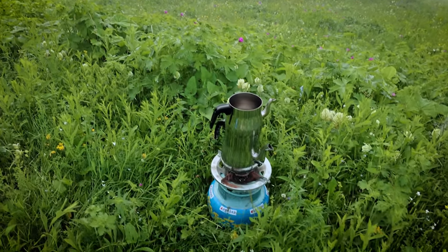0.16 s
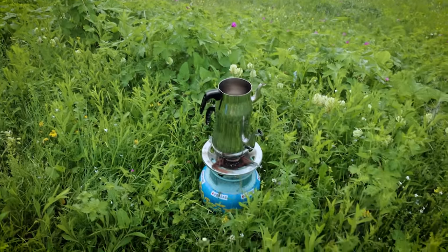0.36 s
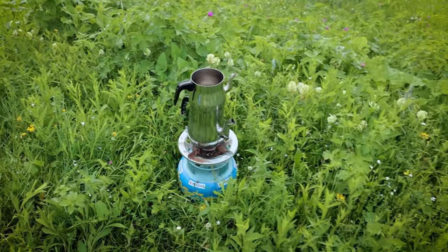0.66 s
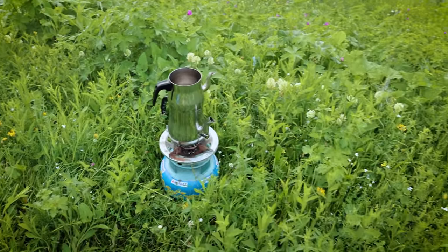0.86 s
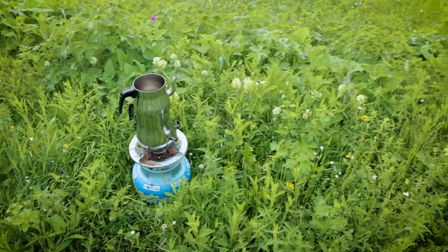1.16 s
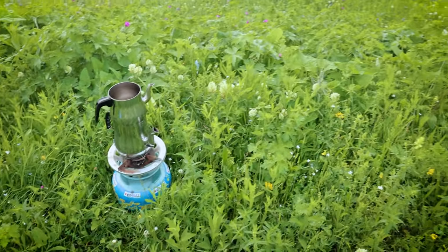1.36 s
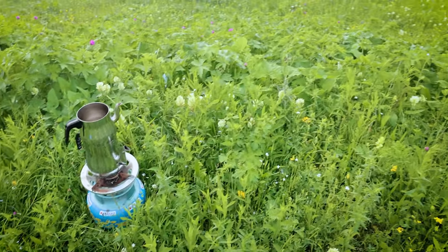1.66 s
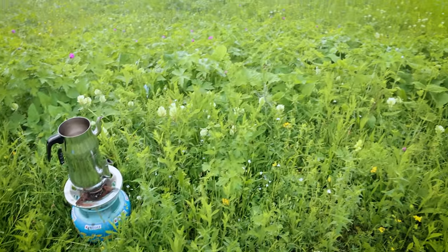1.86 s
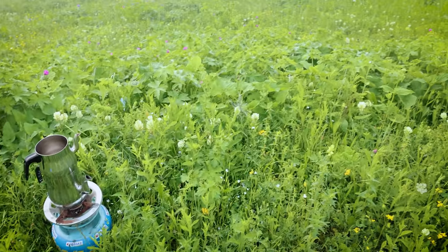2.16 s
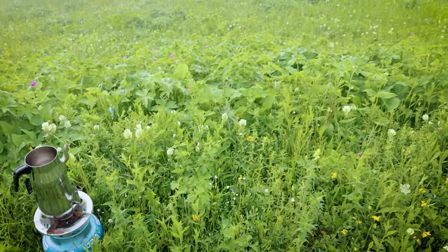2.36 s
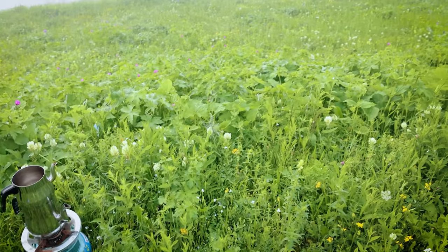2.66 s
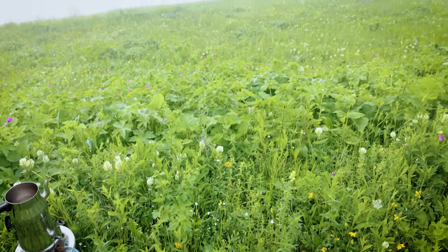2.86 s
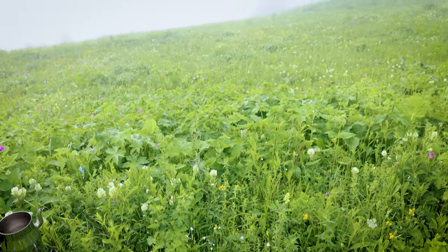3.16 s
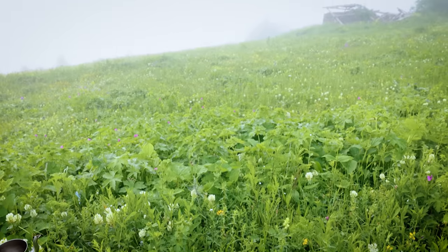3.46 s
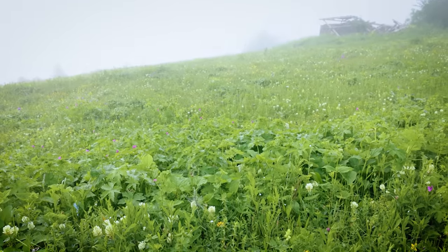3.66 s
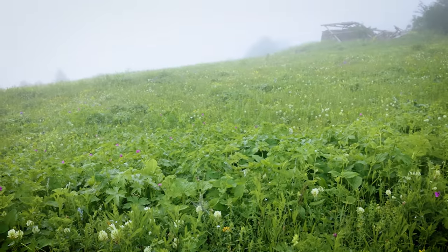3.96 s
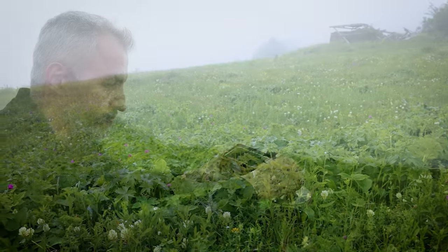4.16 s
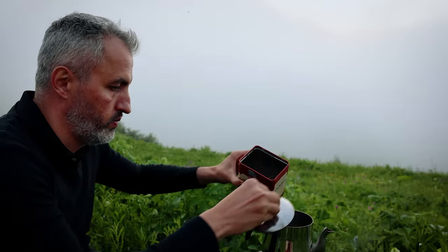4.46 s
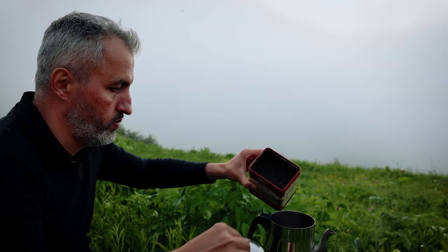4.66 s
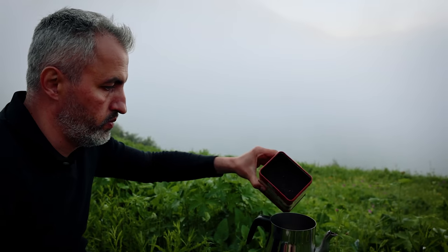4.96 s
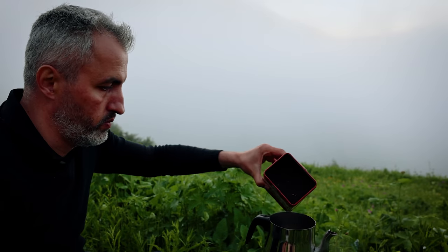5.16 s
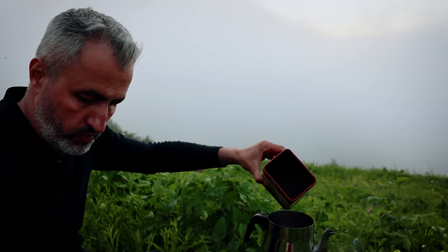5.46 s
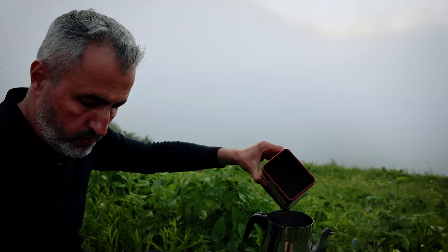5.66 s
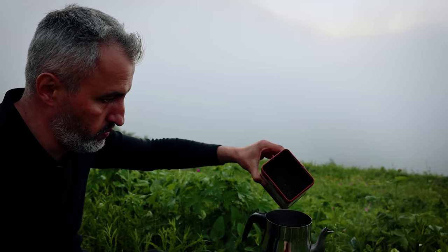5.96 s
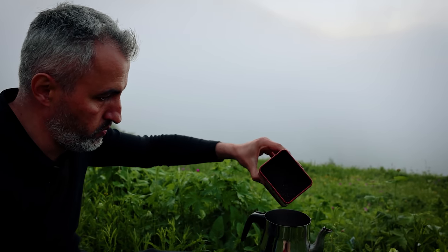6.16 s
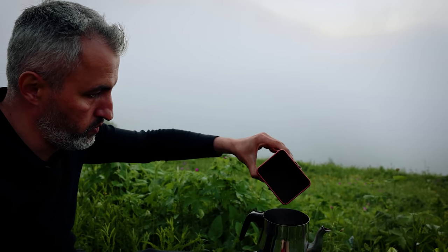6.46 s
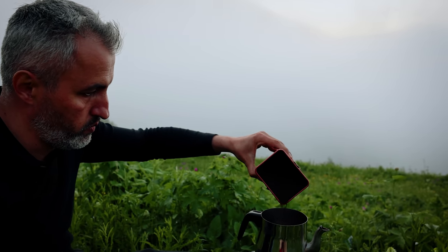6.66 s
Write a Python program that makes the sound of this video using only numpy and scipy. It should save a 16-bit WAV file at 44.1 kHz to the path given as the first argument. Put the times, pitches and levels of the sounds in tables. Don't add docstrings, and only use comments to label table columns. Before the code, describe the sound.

From 0 to 4.3 seconds, a quiet open meadow: far soft wind and many small birds. A nearer bird gives clear sliding whistles and quick chirps from about 0.6 to 1.6 s, with another short drop at 2.25 s; a lower hoarse bird calls around 0.1 to 0.55 s. Fainter whistles overlap throughout, with a slight slope echo. Grass swishes at the start and around 1.2 s; stalks tick near 3.8 s. At 4.3 s it cuts instantly to a close, much louder gas stove: bright steady hiss, high whistling jet, fine fizz and low flame roar, with a few last chirps until 4.6 s. Dull thumps and sputters come at 4.6-5.5 s and 6.1-6.5 s, with low wind puffs. At 5.98 s a tin strikes the steel pot, a sharp, quickly damped clank. Around 6.55 s dry tea rustles in; hiss and roar swell at the end.

```python
import sys
import numpy as np
from scipy import signal
from scipy.fft import rfft, irfft, next_fast_len
from scipy.io import wavfile
from scipy.ndimage import uniform_filter1d, map_coordinates

SR = 44100
rng = np.random.default_rng(int(sys.argv[2]) if len(sys.argv) > 2 else 0)


def transcribe(u):
    v = np.clip(np.atleast_2d(u).T, -1, 1)
    q = np.round(v * 32767).astype(np.int16)
    wavfile.write(sys.argv[1], SR, q)


def voltage_ratio(decibels):
    exponent = np.asarray(decibels, float) / 20
    return 10 ** exponent


N = 300321
CUT_S = 4.280


def unit(x):
    return x / np.sqrt(np.mean(x ** 2) + 1e-20)


def along(points, hz):
    f, value = np.transpose(points)
    return np.interp(np.log(hz + 1), np.log(f + 1), value)


def curves(rows):
    s, *columns = np.transpose(rows)
    return [np.interp(np.arange(N) / SR, s, column) for column in columns]


def wobble(rate):
    knots = rng.standard_normal(int(N * rate / SR) + 4)
    return map_coordinates(knots, [np.arange(N) * rate / SR])


def filtered(x, response):
    m = next_fast_len(N + SR // 2)
    return irfft(rfft(x, m) * response(np.fft.rfftfreq(m, 1 / SR)), m)[..., :N]


def resonance(f, hz, width):
    return 1j * f * width / (hz * hz - f * f + 1j * f * width)


def band(hz, width):
    return lambda f: 1 / (1 + (2 * (f - hz) / width) ** 4)


def shaped(spectrum):
    return lambda hz: voltage_ratio(along(spectrum, hz))


def rush(response, patchy_db, tall=6, long=10):
    z = signal.stft(rng.standard_normal(N), nperseg=512)[2]
    field = uniform_filter1d(rng.standard_normal(z.shape), size=tall, axis=0)
    field = uniform_filter1d(field, size=long, axis=1)
    x = signal.istft(z * voltage_ratio(patchy_db * unit(field)), nperseg=512)[1][:N]
    return unit(filtered(x, response))


ARCH_DB = 9.5


def glide(s, length, from_hz, to_hz, db, bend):
    u = np.linspace(0, 1, num=9)
    hz = to_hz + (from_hz - to_hz) * (1 - u) ** bend
    return np.transpose([s + length * u, hz, db - ARCH_DB * (2 * u - 1) ** 2])


def arch(s, length, foot_hz, top_hz, db):
    rows = glide(s, length, foot_hz, foot_hz, db, 1)
    bow = np.sin(np.linspace(0, np.pi, num=len(rows)))
    return rows + np.outer(bow, [0, top_hz - foot_hz, 0])


# start in seconds, length in seconds, first pitch in Hz,
# last pitch in Hz, peak in dB.
FALLING = [(0, .05, 3760, 2750, -65), (2.33, .09, 2350, 2070, -61), (.2, .07, 3500, 2900, -67),
           (.265, .06, 3550, 2900, -67), (.52, .06, 3850, 3050, -70), (.79, .04, 5800, 4680, -73),
           (.935, .095, 4400, 2650, -61), (1.1, .03, 4100, 3350, -63), (1.69, .02, 4650, 3490, -69),
           (1.83, .12, 4390, 2890, -66), (1.97, .1, 3110, 2150, -70), (2.35, .05, 4250, 3780, -67),
           (2.43, .06, 4000, 3500, -71), (2.57, .06, 4950, 4050, -73), (3.1, .07, 3300, 2550, -69),
           (3.685, .07, 4300, 2850, -67), (1.7, .13, 2300, 1750, -71), (2.11, .06, 4800, 3850, -67),
           (2.12, .05, 5150, 4200, -68), (2.135, .04, 4950, 4300, -70), (2.05, .09, 2200, 1850, -66),
           (1.135, .02, 5300, 4600, -68), (2.29, .07, 3500, 3000, -68),
           (2.65, .07, 3700, 2950, -67), (2.75, .04, 2750, 2200, -68), (2.8, .06, 3780, 3100, -68),
                 (2.95, .09, 3410, 2260, -70), (3.0, .08, 3990, 2550, -65), (3.11, .09, 4650, 2650, -68),
                 (3.125, .12, 5300, 3250, -67), (3.31, .05, 3400, 2500, -70),
                 (3.547, .085, 5650, 3200, -64), (3.6, .09, 4580, 2700, -68), (3.19, .1, 3700, 2750, -67),
                 (1.425, .015, 5600, 5000, -66), (3.81, .05, 4000, 3000, -68), (3.83, .04, 2200, 1850, -72),
                 (1.1, .05, 4500, 3100, -66), (1.385, .02, 3400, 3050, -64), (3.27, .1, 3900, 2500, -69),
                 (4.08, .08, 5000, 3700, -76), (3.91, .14, 4250, 2100, -70), (2.69, .1, 3150, 2250, -70),
                 (4.615, .03, 5200, 4000, -59), (4.58, .03, 4500, 4700, -62)]
# as above, in seconds, seconds, Hz, Hz, dB.
RISING = [(.09, .065, 3160, 3520, -62), (2.86, .08, 3800, 4150, -69), (.805, .04, 3250, 3560, -67),
          (1.45, .18, 2990, 3950, -65), (1.84, .21, 3120, 4010, -69), (2.53, .11, 3150, 3710, -68),
          (2.55, .04, 3300, 4100, -72), (2.77, .06, 3300, 4700, -72), (2.87, .07, 2850, 3300, -69),
          (3.02, .06, 4050, 4550, -72), (3.36, .06, 3050, 3500, -69), (.15, .05, 2600, 3450, -69),
          (.72, .04, 3100, 3450, -68), (2.67, .05, 4180, 5000, -73), (2.83, .07, 4330, 4850, -72),
          (3.455, .09, 2700, 3760, -64), (3.66, .15, 3250, 4450, -70), (3.79, .11, 4350, 5000, -63),
          (3.96, .09, 2820, 3560, -70), (4.16, .05, 3600, 3900, -66), (4.11, .05, 4080, 3690, -65),
          (4.205, .05, 3900, 3210, -61), (4.13, .16, 2840, 3750, -65), (3.68, .15, 1980, 2270, -66),
          (1.49, .16, 2000, 2170, -69)]
# start in seconds, length in seconds, pitch in Hz, peak in dB.
HELD_NOTES = [(.18, .12, 2810, -60), (2.73, .06, 2230, -68), (3.55, .08, 3500, -68), (2.96, .06, 4080, -71),
              (.585, .03, 3500, -66), (.865, .04, 4550, -65), (1.3, .03, 3100, -66),
              (2.215, .05, 2140, -68), (2.43, .11, 2700, -67), (1.19, .015, 3480, -60),
              (1.11, .015, 3050, -62), (1.16, .05, 3800, -69), (.33, .07, 3450, -68),
              (3.07, .22, 2080, -68), (3.29, .11, 2340, -64), (3.49, .12, 2400, -69), (3.7, .05, 3300, -63),
              (3.91, .045, 3260, -64), (4.0, .045, 3640, -64), (4.37, .1, 2700, -57),
              (4.42, .04, 4420, -61)]
# start in seconds, length in seconds, foot in Hz, top in Hz, peak in dB.
ARCHED = [
    (0.322, 0.15, 3150, 3870, -60.5),
    (.46, 0.1, 3300, 3950, -75),
    (.77, .04, 5500, 5950, -75),
    (3.207, 0.038, 5600, 6100, -72),
]
FALL_BEND, RISE_BEND = 1.5, 1.3
SAG_HZ_PER_S = 490


def whistles():
    held = [glide(s, length, hz, hz - SAG_HZ_PER_S * length, db, 0.92) for s, length, hz, db in HELD_NOTES]
    falls = [glide(*row, FALL_BEND) for row in FALLING]
    rises = [glide(*row, RISE_BEND) for row in RISING]
    return falls + rises + held + [arch(*row) for row in ARCHED]


def chorus(count):
    notes = []
    for when, pitch, slide, length, size in rng.random((count, 5)):
        s = 4.3 * when + np.array([0, .5, 1]) * (.08 + .14 * length)
        bend_hz = np.array([1, .4, 0]) * (2100 * slide - 800)
        level_db = -78.5 + 6 * size + np.array([-3, 0, -3])
        notes.append(np.transpose([s, 2450 + 1100 * pitch + bend_hz, level_db]))
    return notes


# frequency in Hz, t60 in seconds.
SLOPE_T60 = [(1500, .5), (4000, .3), (8000, .2)]


def slope_echo(x):
    hz, t, z = signal.stft(rng.standard_normal(SR // 2), SR, nperseg=256)
    decay = voltage_ratio(-60 * t / along(SLOPE_T60, hz)[:, None])
    tail = signal.istft(z * decay, SR, nperseg=256)[1]
    return signal.fftconvolve(np.pad(x, (600, 0)), tail / np.linalg.norm(tail))[:N]


# time in seconds, pitch in Hz, effort in dB.
NEAR_CALLS = [
    [(0.625, 4370, -66), (0.635, 4300, -64), (0.648, 3680, -60), (0.658, 2700, -73), (0.67, 2400, -68),
     (0.68, 2500, -66.5)],
    [(0.69, 2970, -71), (0.72, 3450, -66), (0.75, 3590, -67), (0.77, 3680, -50), (0.81, 4150, -51.5),
     (0.835, 4120, -64)],
    [(0.9, 6040, -70), (0.935, 5100, -68), (0.965, 4420, -49.5), (0.99, 4100, -53), (1.005, 3870, -45.5),
     (1.033, 3430, -46.5), (1.057, 3080, -61), (1.077, 3040, -50.5), (1.1, 3240, -69)],
    [(1.158, 2835, -49.5), (1.18, 2290, -63), (1.19, 2314, -62), (1.207, 2790, -54), (1.225, 3160, -60),
     (1.265, 3500, -46), (1.28, 3620, -50), (1.294, 3710, -40.5), (1.317, 3880, -48.5)],
    [(1.375, 4840, -59), (1.383, 3540, -59), (1.39, 4330, -52), (1.398, 4700, -51), (1.405, 4870, -58)],
    [(1.436, 4950, -64), (1.444, 4570, -50), (1.456, 4120, -53), (1.465, 3830, -44.5), (1.476, 3480, -55),
     (1.497, 3050, -60), (1.53, 2760, -54), (1.574, 2410, -64), (1.59, 2340, -70)],
    [(2.245, 4400, -60), (2.262, 3710, -53), (2.272, 3000, -60), (2.28, 2300, -60)],
]
# time in seconds, pitch in Hz, effort in dB.
HOARSE_CALLS = [
    [(0.085, 2420, -71), (0.12, 2290, -66), (0.155, 2250, -57), (0.19, 2190, -63), (0.23, 2230, -72)],
    [(0.28, 2233, -70), (0.33, 2210, -70), (0.37, 2240, -62), (0.41, 2330, -62.5), (0.45, 2200, -61),
     (0.49, 2080, -68), (0.5, 2250, -66), (0.55, 2220, -73)],
]
# time in seconds, pitch in Hz, effort in dB.
LONG_SLIDES = [
    [(1.79, 4160, -64), (1.8, 2985, -59), (1.815, 2940, -68), (1.84, 3560, -63), (1.98, 4220, -60),
     (2.03, 4540, -59), (2.048, 5120, -64)],
    [(3.228, 6230, -68), (3.25, 5080, -63), (3.27, 4440, -61), (3.32, 4000, -73), (3.4, 3680, -63.5),
     (3.455, 3700, -64)],
]
HOARSE_DB, HOARSE_UNDER_HZ = 3.6, 2550


def birds():
    out = np.zeros(N)
    shimmer, waver = voltage_ratio(1.2 * wobble(70)), 1 + .003 * wobble(90)
    hoarse_db = HOARSE_DB * wobble(170) - .6
    for rows in [*NEAR_CALLS, *HOARSE_CALLS, *LONG_SLIDES, *whistles(), *chorus(count=240)]:
        s, hz, db = np.transpose(rows)
        i = np.arange(round(s[0] * SR), round(s[-1] * SR))
        smooth = lambda v: uniform_filter1d(np.interp(i / SR, s, v), size=220)
        pitch = smooth(hz)
        ends = np.clip(np.minimum(i - i[0], i[-1] - i) / (0.0019 * SR), 0, 1)
        rasp_db = hoarse_db[i] * np.clip((HOARSE_UNDER_HZ - pitch) / 250, 0, 1)
        tone = np.sin(2 * np.pi * np.cumsum(pitch * waver[i]) / SR)
        out[i] += np.sqrt(2) * ends * voltage_ratio(smooth(db) + 1.5 + rasp_db) * tone
    out = out * shimmer
    return out + voltage_ratio(-17.5) * slope_echo(out)


# time in seconds, brightening in dB.
JET_FLARES = [
    (4.29, 2),
    (4.59, 5),
    (4.87, 6.5),
    (5.18, 1),
    (5.32, -5),
    (5.6, 5),
    (5.75, 8),
    (5.95, 3),
    (6.2, 1),
    (6.72, 7),
]
# time in seconds, jump in dB.
JET_SPURTS = [
    (4.865, 4),
    (5.305, 10),
    (6.05, 12),
    (6.7, 2),
]
FLARE_S, SPURT_S = 0.071, 0.018


def flares():
    t = np.arange(N) / SR
    swell_db = sum(db * np.exp(-((t - s) / FLARE_S) ** 2) for s, db in JET_FLARES)
    spit_db = sum(db * (t > s) * np.exp(-np.abs(t - s) / SPURT_S) for s, db in JET_SPURTS)
    return swell_db + spit_db


# time in seconds, centre of the whistle in Hz.
JET_CENTRE = [(4.29, 7170), (4.4, 6900), (4.93, 7220), (5.44, 7030), (5.81, 7360), (6.46, 6700),
              (6.55, 7500), (6.74, 7400), (6.8, 6960)]


def throat():
    return np.clip((curves(JET_CENTRE)[0] - 6750) / 700, 0, 1)


RIDGES = dict(tall=3, long=22)
# time in seconds, whistle band in dB.
JET_LEVEL = [(4.29, -52), (4.59, -53), (4.76, -51), (4.81, -61), (4.87, -50.5), (5.0, -52.5), (5.18, -49.5),
             (5.25, -52), (5.32, -48), (5.39, -49.5), (5.57, -52), (5.71, -52.5), (5.79, -54), (6.21, -53),
             (6.4, -55.5), (6.46, -59.5), (6.62, -54.5), (6.77, -47.5)]


def jet():
    up = throat()
    low_core = np.sqrt(1 - up) * rush(band(6800, width=550), patchy_db=3.0, **RIDGES)
    high_core = np.sqrt(up) * rush(band(7350, width=550), patchy_db=3.0, **RIDGES)
    whistle = voltage_ratio(-3.5) * rush(band(hz=6970, width=1460), patchy_db=2.0, **RIDGES)
    whistle = whistle + voltage_ratio(-3) * (low_core + high_core)
    edge_db = -10 + flares() - 1.2
    edge = voltage_ratio(edge_db) * rush(band(hz=8050, width=800), patchy_db=3, **RIDGES)
    return voltage_ratio(curves(JET_LEVEL)[0]) * (whistle + edge)


# time in seconds, width in seconds, change in dB.
FIZZ_SWELLS = [
    (4.35, .08, 4),
    (4.8, 0.026, 0.5),
    (5.08, .05, 2.5),
    (5.32, 0.042, 0.5),
    (5.72, 0.085, 2),
    (6.05, 0.039, 2),
    (6.4, .08, -4),
    (6.55, 0.026, 9),
]
FIZZ_DB, FIZZ_SHARE, FIZZ_FLARES = -58.5, 0.31, 0.35


def fizz():
    t = np.arange(N) / SR
    jet_db, flare_db = curves(JET_LEVEL)[0], flares()
    level_db = FIZZ_DB + FIZZ_SHARE * (jet_db - jet_db[t > CUT_S].mean()) + FIZZ_FLARES * flare_db - 1.4
    level_db = level_db + sum(db * np.exp(-((t - s) / width) ** 2) for s, width, db in FIZZ_SWELLS)
    sway_db = 0.3 * wobble(4.4) + 0.22 * (flare_db - 6.0) + 1.2 * (throat() - .45)
    low = rush(band(10950, width=2000), patchy_db=1.7, **RIDGES)
    high = rush(band(11850, width=2000), patchy_db=1.7, **RIDGES)
    return voltage_ratio(level_db - 3.0) * (voltage_ratio(-sway_db) * low + voltage_ratio(sway_db) * high)


# frequency in Hz, width in Hz, level in dB.
BURNER_MODES = [(1230, 170, -4.5), (1428, 277, -2), (2197, 390, -7.5), (3100, 400, -5.5), (3706, 234, 0),
                (4044, 345, -4.5)]
# frequency in Hz, level in dB per Hz.
VEIL_SPECTRUM = [(600, -22), (1000, -2.5), (4500, -3), (6000, -8), (9500, -2.5), (12800, -17),
                 (14500, -3.5), (15700, -11)]
HISS_DB, HISS_GROWS_DB_PER_S = -49, 0.38


def hiss():
    level_db = HISS_DB + HISS_GROWS_DB_PER_S * (np.arange(N) / SR - CUT_S)

    def coloured(f):
        modes = sum((-1) ** k * voltage_ratio(db) * resonance(f, hz, w) for k, (hz, w, db) in enumerate(BURNER_MODES))
        return modes * resonance(f, hz=2400, width=5900) ** 2

    burner = voltage_ratio(level_db + .4) * rush(coloured, patchy_db=1.3, **RIDGES)
    return burner + voltage_ratio(level_db - 9) * rush(shaped(VEIL_SPECTRUM), patchy_db=.4)


# time in seconds, roar in dB.
FLAME_LEVEL = [(4.29, -55.5), (4.6, -52.5), (5.1, -52.5), (5.4, -52), (5.95, -52), (6.15, -50),
               (6.4, -47.5), (6.58, -48.5), (6.7, -52), (6.81, -46)]
# frequency in Hz, level in dB per Hz.
ROAR_SPECTRUM = [(13, -30), (22, -2), (48, -3), (207, 0.5), (392, -5.5), (440, -3), (581, -8),
                 (1100, -11.5), (1430, -30), (2420, -120)]


def stove():
    roar_db = curves(FLAME_LEVEL)[0] + 0.1 + 0.37 * wobble(30)
    roar = voltage_ratio(roar_db) * rush(shaped(ROAR_SPECTRUM), patchy_db=1.96)
    flutter = voltage_ratio(.5 * wobble(25) + .7 * wobble(200))
    return roar + flutter * (hiss() + fizz() + jet())


# start in seconds, peak in dB.
FLAME_THUMPS = [(4.631, -35), (4.649, -46), (4.687, -37), (4.737, -34), (4.948, -36), (5.09, -36),
                (5.118, -35), (5.32, -35), (5.544, -55), (6.128, -33), (6.198, -27), (6.253, -31),
                (6.287, -30), (6.44, -38), (6.459, -28.5), (6.637, -49), (6.789, -57)]
# start in seconds, dull peak in dB, bright peak in dB.
FLAME_SPUTTERS = [(4.644, -45, -64), (4.945, -38, -65), (4.99, -40, -57), (5.086, -37, -56),
                  (5.27, -47, -62), (5.526, -35, -63), (5.538, -35.5, -70), (6.119, -42, -60),
                  (6.2, -35, -56), (6.283, -32.5, -62), (6.326, -38, -60), (6.444, -35, -66)]
# start in seconds, peak in dB.
DRY_SPARKS = [
    (6.287, -49),
    (6.331, -52),
    (6.443, -53),
    (6.2, -52),
]
# start in seconds, peak in dB, signed push or pull.
HAND_BUMPS = [
    (4.741, -41, 1),
    (4.948, -41, -1),
    (5.087, -37, -0.86),
    (5.272, -37, -1),
    (5.529, -40, 0.91),
    (5.539, -33, 1),
    (6.202, -33, 1),
    (6.286, -41, -1.1),
    (6.443, -42, -1),
    (6.459, -41, 1),
]
SPARK_S, BUMP_S = 0.0086, 0.00035


def thumps():
    out, t = np.zeros(N + SR), np.arange(1500) / SR

    def place(s, x):
        out[round(s * SR):][:len(t)] += x

    for s, db in FLAME_THUMPS:
        u = t / 0.0013
        place(s, -voltage_ratio(db - 9.5) * np.sin(u) * np.exp(-.12 * (u - 3) ** 2))
    for s, db, bright_db in FLAME_SPUTTERS:
        noise = rng.standard_normal((2, len(t)))
        dull = voltage_ratio(db - 60 * t / 0.065) * signal.lfilter([.15, .15], [1, -.9], noise[0])
        bright = voltage_ratio(bright_db + 3 - 60 * t / .012) * signal.lfilter([.3, .3], [1, -.5], noise[1])
        place(s, voltage_ratio(-3.0) * (dull + bright))
    for s, db in DRY_SPARKS:
        place(s, voltage_ratio(db - 60 * t / SPARK_S) * np.diff(rng.standard_normal(len(t) + 1)))
    for s, db, sign in HAND_BUMPS:
        u = t / BUMP_S
        place(s, sign * voltage_ratio(db + 2) * np.sin(u) * np.exp(-.4 * u))
    return out[:N]


# start in seconds, peak in dB.
RIM_KNOCK = [
    (5.9823, -14),
]
# frequency in Hz, level in dB, t60 in seconds.
POT_MODES = [(517, -6, .2), (765, -5, .1), (797, 0, .13), (1150, -10, .12), (1192, -5, .14),
             (1230, -13, .15), (1345, -11, .2), (1432, -6, .12), (1825, -6, .08), (1935, -4, .1),
             (1968, -3, .12), (2298, -8, .25), (2390, -4, .6), (2435, -1, .2), (2490, 3, .09),
             (2730, -10, .2), (2821, -4, .2), (3342, -4, .17), (3488, -11, .2), (3612, -6, .15),
             (3760, 5, .03), (3950, 9, .01), (4100, -3, .12), (4422, -14, .2), (4545, -14, .2),
             (4581, -12, .2), (4635, -10, .15), (4880, -14, .1), (5125, -18, .2), (5330, -17, .1),
             (5566, -19, .17), (5734, -17, .17), (6869, -19, .17)]
# frequency in Hz, level in dB per Hz.
TIN_SPECTRUM = [(400, -20), (680, -20), (850, -1), (1500, -1), (2500, -1), (3700, 5), (5200, -9),
                (8000, -18), (12500, -26), (15000, -45)]


def knock():
    out, t = np.zeros(N + SR), np.arange(SR // 3) / SR
    clatter = rush(shaped(TIN_SPECTRUM), patchy_db=-1.0)[:len(t)]
    for s, db in RIM_KNOCK:
        ring = sum(voltage_ratio(level - 60 * t / t60) * np.sin(2 * np.pi * hz * t) for hz, level, t60 in POT_MODES)
        choke = voltage_ratio(-600 * np.clip(t - .052, 0, None))
        body = 1.1 * voltage_ratio(-60 * t / .13) + 1.2 * voltage_ratio(-60 * t / .012)
        rise = np.clip(t / .0004, 0, 1)
        out[round(s * SR):][:len(t)] += voltage_ratio(db - 18.0) * (ring + body * clatter) * rise * choke
    return filtered(out[:N], lambda f: (1j * f / (1j * f + 300)) ** 2)


# time in seconds, level in dB.
TEA_LEVEL = [(6.4, -88), (6.52, -54), (6.56, -45.5), (6.6, -42), (6.63, -54), (6.68, -84)]
# frequency in Hz, level in dB per Hz.
LEAF_SPECTRUM = [(250, 4.5), (500, 0), (1500, -8.5), (5000, -13.5), (15500, -18)]


def tea():
    grains = voltage_ratio(1.8 * wobble(300))
    leaves = rush(shaped(LEAF_SPECTRUM), patchy_db=1.5)
    return voltage_ratio(curves(TEA_LEVEL)[0]) * unit(grains * leaves)


# start in seconds, rise in seconds, end in seconds, strength in dB.
GRASS_GUSTS = [
    (0, 0.096, .36, 13.5),
    (.36, .01, .9, 3),
    (1.15, 0.074, 1.254, 13),
]
LULL_S = 0.054


def gusts():
    t, strengths = np.arange(N) / SR, []
    for s, rise, end, db in GRASS_GUSTS:
        swell = np.minimum(.5 + (t - s) / rise / 2, 1 + (end - t) / LULL_S)
        strengths.append(db * np.clip(swell, 0, 1))
    return np.max(strengths, axis=0)


# frequency in Hz, level in dB per Hz.
FAR_SPECTRUM = [(15, -47), (28, -14), (45, -3.5), (136, 0), (261, -2), (1030, -2.5), (1180, -5),
                (2070, -9.5), (3560, -16), (5050, -19), (14400, -31.5), (15600, -32)]
# frequency in Hz, level in dB per Hz.
GRASS_SPECTRUM = [(700, -12), (2500, 11.5), (5000, 2.5), (7500, -11), (9300, -2), (15500, -16)]
# start in seconds, peak in dB.
STALK_TICKS = [
    (3.789, -42),
    (3.852, -39),
]
# centre in seconds, width in seconds, level in dB.
WIND_PUFFS = [
    (.03, .05, -68),
    (.72, 0.065, -72),
    (1.0, 0.025, -68),
    (2.57, 0.065, -65),
    (4.67, 0.056, -49.5),
    (4.87, 0.034, -51),
    (5.1, 0.033, -47),
    (5.58, .03, -50),
    (6.62, .05, -39),
]
WIND_DB, GRASS_DB, WIND_SHARE = -59.5, -84.5, 0.12


def meadow():
    gust_db = gusts()
    wind_db, grass_db = WIND_DB + WIND_SHARE * gust_db, GRASS_DB + gust_db
    far = voltage_ratio(wind_db + 0.97 + 0.26 * wobble(3.0)) * rush(shaped(FAR_SPECTRUM), patchy_db=1.5)
    blur = voltage_ratio(-69.0) * rush(lambda f: resonance(f, hz=3460, width=2170) ** 3, patchy_db=5.5)
    swish = np.sqrt(np.clip(voltage_ratio(grass_db) ** 2 - voltage_ratio(-85.0) ** 2, 0, None))
    grass = voltage_ratio(9.0) * swish * rush(shaped(GRASS_SPECTRUM), patchy_db=0.5)
    snaps = np.zeros(N)
    for s, db in STALK_TICKS:
        snaps[round(s * SR) + np.array([0, 70, 130])] = voltage_ratio(db + 13) * np.array([-1, .7, -.5])
    ticks = filtered(snaps, lambda f: resonance(f, hz=2000, width=5500) ** 3)
    t = np.arange(N) / SR
    puffs = sum(voltage_ratio(db - 3.0 * ((t - s) / width) ** 2) for s, width, db in WIND_PUFFS)
    buffet = puffs * rush(lambda f: resonance(f, hz=50, width=46) ** 2, patchy_db=1.0)
    return far + blur + grass + buffet + ticks


# frequency in Hz, level in dB per Hz.
MEADOW_WIDTH = [(15, -49), (25, -9), (4070, -23), (4780, 0), (8650, -7), (9900, -3), (15600, -16)]
# frequency in Hz, level in dB per Hz.
STOVE_WIDTH = [(15, -24), (25, 5.5), (808, -23), (1180, -35), (1350, -63), (3960, -46), (4410, -37),
               (15600, -21.5)]
# time in seconds, centre in Hz, width in Hz, level in dB.
SIDE_SLIPS = [
    (5.245, 7550, 1700, -3),
    (5.567, 5900, 3700, -2),
    (6.243, 5500, 3000, -2),
]
SLIP_S = .013


def width_signal(mid, near):
    t = np.arange(N) / SR
    side = (1 - near) * voltage_ratio(-101.5) * rush(shaped(MEADOW_WIDTH), patchy_db=5.0)
    side += near * voltage_ratio(-64.5) * rush(shaped(STOVE_WIDTH), patchy_db=2.5)
    for s, hz, width, db in SIDE_SLIPS:
        moment = mid * np.exp(-((t - s) / SLIP_S) ** 4)
        side += voltage_ratio(db) * filtered(moment, lambda f: band(hz, width)(f) ** 3)
    return side


def scene():
    t = np.arange(N) / SR
    near = np.clip((t - CUT_S) / 0.0021, 0, 1)
    fade = voltage_ratio(-8 * np.clip(t - CUT_S, 0, None))
    mid = birds() + fade * meadow() + near * (stove() + thumps() + knock() + tea())
    side = width_signal(mid, near)
    return np.array([mid + side, mid - side])


def low_pass(x):
    return signal.sosfilt(signal.butter(12, 15800, fs=SR, output="sos"), x)


def record(dry):
    kept = filtered(dry, lambda hz: hz < 15750)
    return low_pass(kept)


dry = scene()
out = record(dry)
transcribe(out)
```